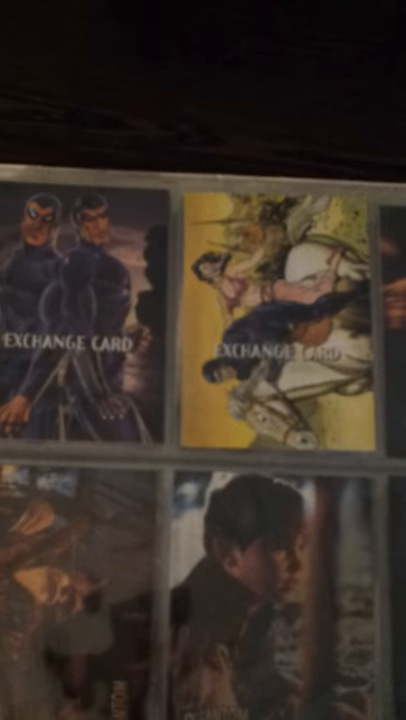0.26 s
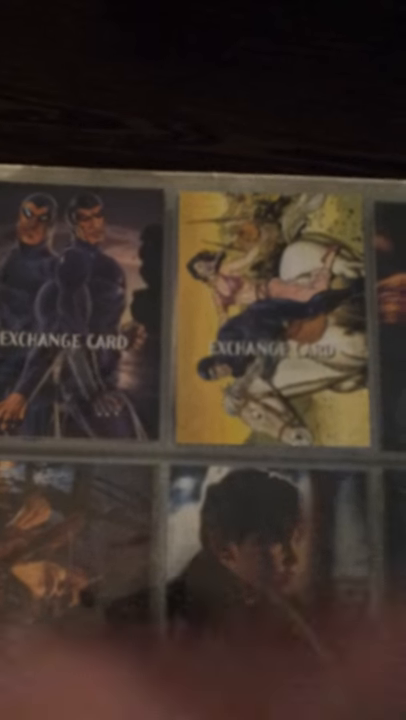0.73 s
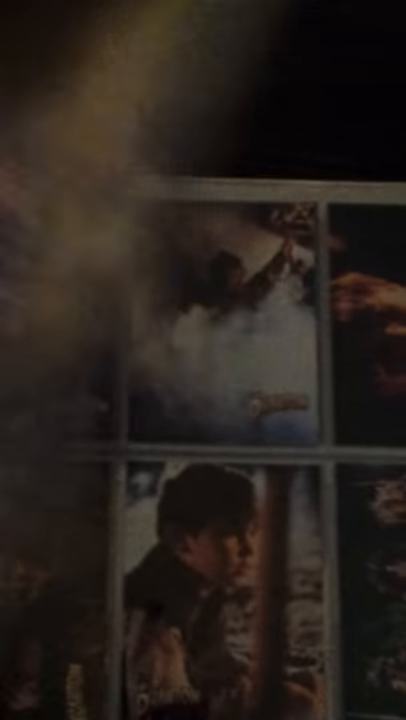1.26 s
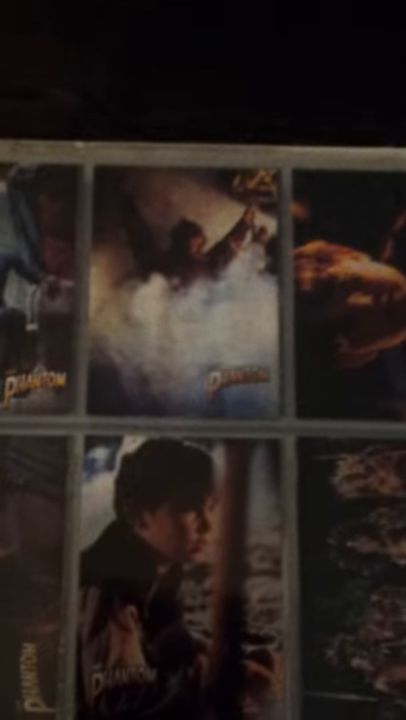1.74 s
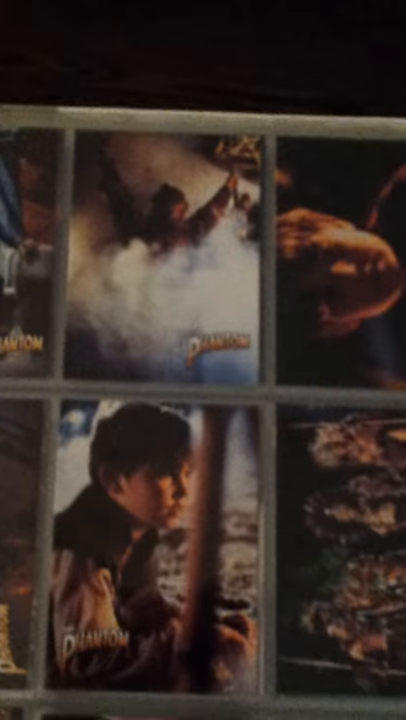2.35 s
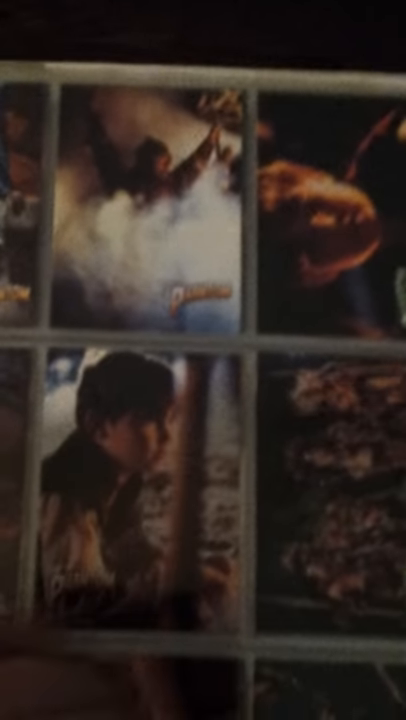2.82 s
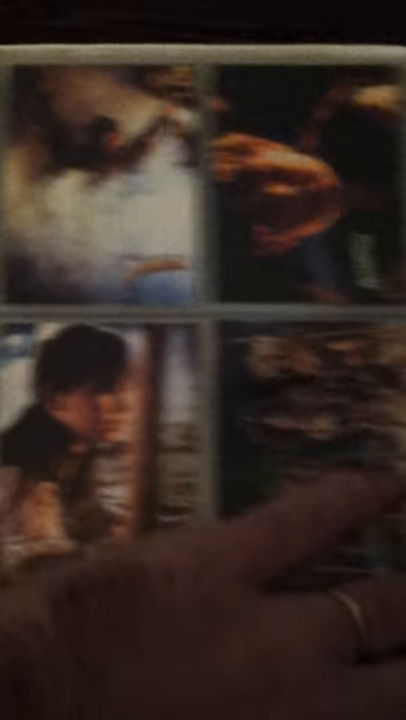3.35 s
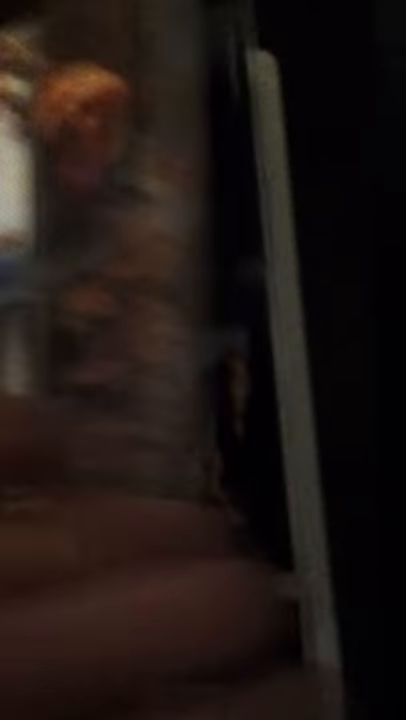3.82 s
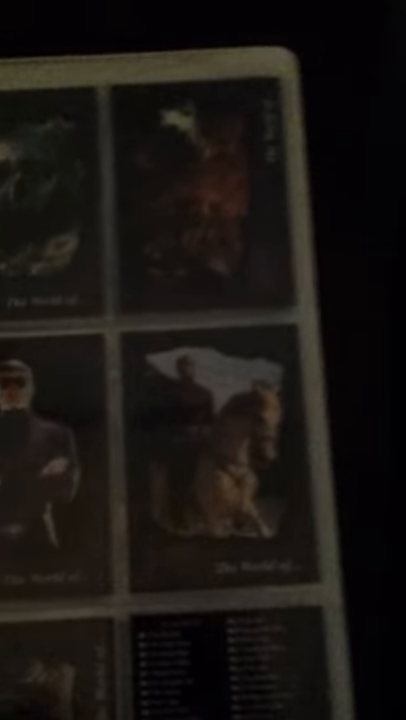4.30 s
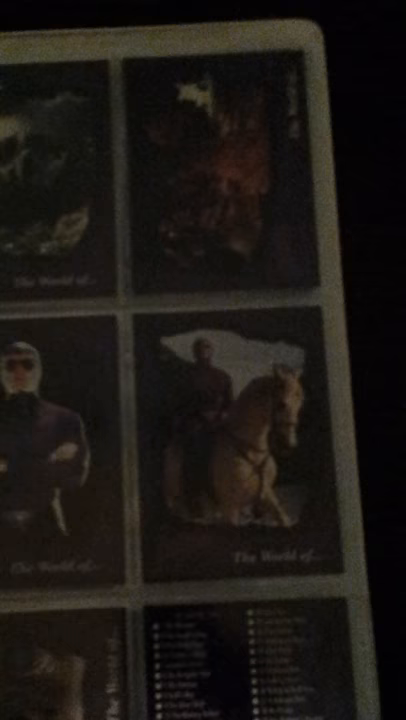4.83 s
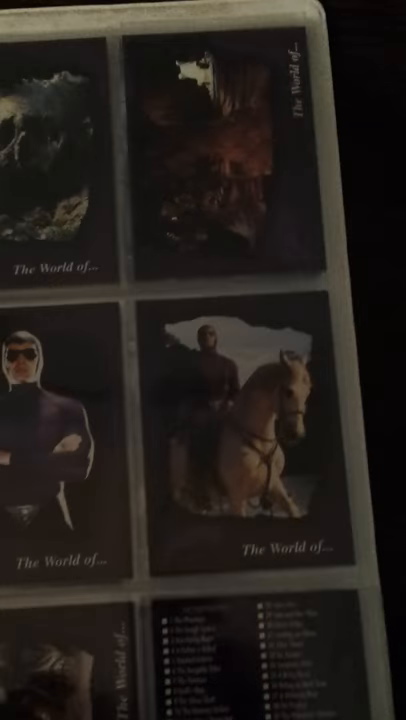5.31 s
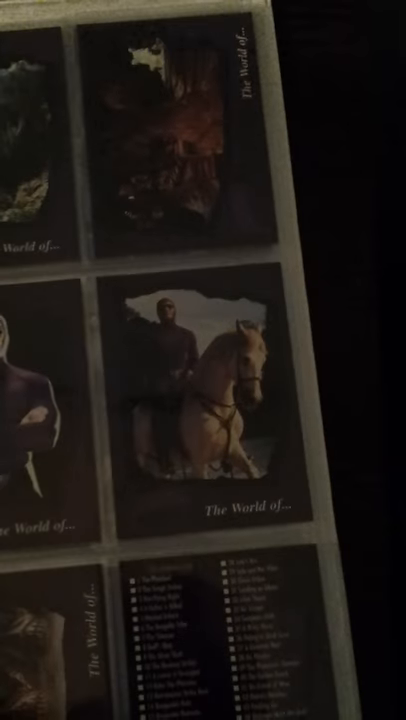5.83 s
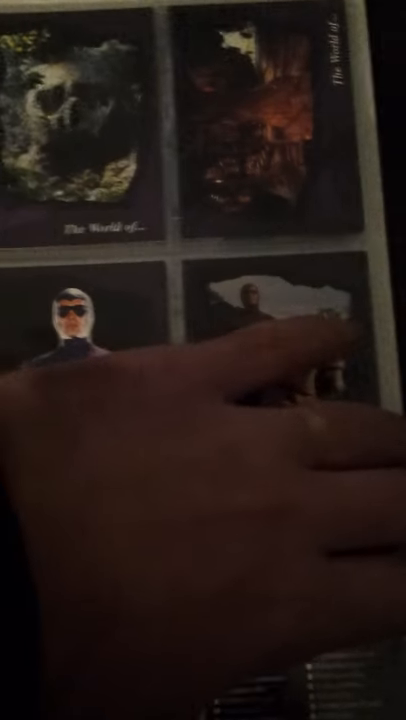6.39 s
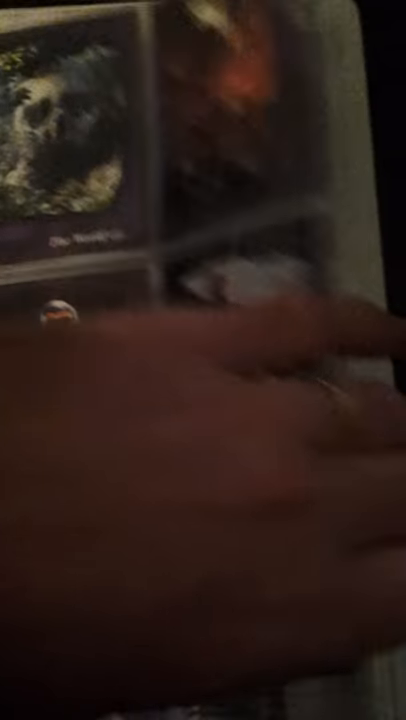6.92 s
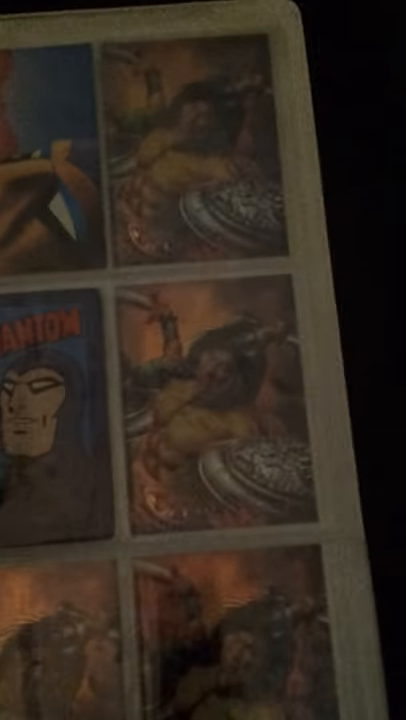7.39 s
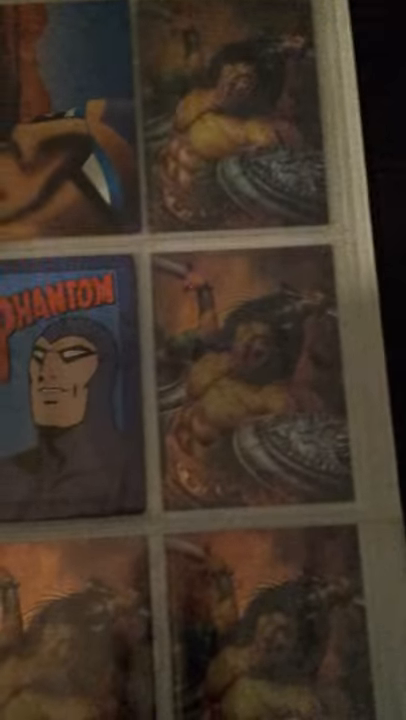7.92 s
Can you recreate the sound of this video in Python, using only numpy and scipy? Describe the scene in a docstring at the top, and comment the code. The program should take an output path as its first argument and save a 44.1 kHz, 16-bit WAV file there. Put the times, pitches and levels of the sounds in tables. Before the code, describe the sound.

A hand turns plastic card sleeves in a ring binder, close to the microphone in a quiet room. The pages hiss and swish over each other, creases tick, and stiff cards snap in their pockets before each page lands with soft thumps. After a brief lull comes a longer stretch of crinkling that peaks in a few sharp snaps, then lighter brushing and one more crackling turn.

```python
"""A quiet room, close to a ring binder whose pages of plastic card sleeves are being turned.
A hand brushes and lifts each page, and the film hisses, rustles and swishes over its neighbour.
Creases flip with sharp ticks, a fingertip judders, and stiff cards snap in their buckling pockets.
The pages land on the stack with soft thumps, over faint air and a short room tail."""
import sys
import numpy as np
from scipy import signal
from scipy.fft import rfft, irfft
from scipy.io import wavfile
from scipy.ndimage import uniform_filter1d, map_coordinates

SR = 44100
rng = np.random.default_rng(int(sys.argv[2]) if len(sys.argv) > 2 else 0)


def int16_out(signal):
    """Quantize to a 16-bit WAV file."""
    q = np.round(np.clip(np.atleast_2d(signal).T, -1, 1) * 32767)
    wavfile.write(sys.argv[1], SR, q.astype(np.int16))


N = 359415
TIME = np.arange(N) / SR

# tone of cracking film: f/Hz, relative level/dB
CRACK_TONE = [(600, -20), (1800, -9), (4400, -8), (7000, -7), (8200, -10.5), (10000, -15.5), (12000, -19)]
# a page slides over its neighbour, levels at the end of the move: start/s, end/s, swell/dB,
# hiss/dB, rustle/dB, catches against the hiss/dB, swish/dB, swish f/Hz
PAGE_SLIDES = [(0.35, 0.814, 1, -71, -61.5, 2, -72, 1710),
               (0.859, 0.935, 6.5, -48.5, -50.5, -12, -63, 2990),
               (1.045, 1.312, 0, -58, -54, -15, -69, 3060), (1.281, 1.415, 11.5, -46.5, -46, -2, -44, 6660),
               (1.438, 1.493, 2, -40.5, -42.5, -5, -39.5, 5830),
               (1.526, 1.737, 2.5, -43.5, -48, -3, -49, 1595),
               (2.207, 2.345, 13.5, -41, -41, -18, -71, 1220),
               (4.035, 4.215, 5.5, -57, -51.5, 8, -50, 6600),
               (4.163, 4.213, 2.5, -40, -40, -6, -34.5, 6260),
               (4.255, 4.504, 6.5, -42.5, -42.5, 5, -45.5, 720),
               (4.616, 4.875, 17, -40, -41.5, -1.5, -44.5, 1687),
               (5.027, 5.105, 4, -46, -46.5, -0.5, -52.5, 1506),
               (5.495, 5.605, 13, -61, -40.5, -26.5, -36, 7240),
               (5.614, 5.641, 13, -39.5, -46.5, -9, -33.5, 7690),
               (7.28, 7.338, 4.5, -37, -42.5, 6.5, -46.5, 910),
               (7.33, 7.544, 4.5, -40.5, -46, -4.5, -50, 1793),
               (7.768, 7.941, -5, -51.5, -50, 4, -66, 1510)]


def from_db(db):
    """Decibels to gain."""
    return 10 ** (np.asarray(db) / 20)


def rms_one(x):
    """Scale to rms 1."""
    return x / np.sqrt(np.mean(x ** 2) + 1e-20)


def at_hz(points, hz):
    """Read a curve on a log-frequency axis."""
    f, value = np.transpose(points)
    return np.interp(np.log(np.maximum(hz, 1)), np.log(f), value)


def colour(x, spectrum, size=2048):
    """Minimum-phase EQ of the given spectrum; white noise keeps its power."""
    cepstrum = irfft(np.log(from_db(at_hz(spectrum, np.fft.rfftfreq(size, 1 / SR)))))
    cepstrum[1:size // 2] *= 2
    cepstrum[size // 2 + 1:] = 0
    response = irfft(np.exp(rfft(cepstrum)))
    return signal.fftconvolve(x, response / np.linalg.norm(response))[:len(x)]


def resonate(x, hz, width_hz):
    """One resonance with gain 1 at its peak."""
    r = np.exp(-np.pi * width_hz / SR)
    feedback = [1, -2 * r * np.cos(2 * np.pi * hz / SR), r * r]
    return signal.lfilter(np.array([1, 0, -1]) * (1 - r * r) / 2, feedback, x + 1e-18)


def drift(per_s):
    """A random wander with a spread near 1."""
    return np.interp(TIME * per_s, np.arange(4096), rng.standard_normal(4096))


def add(out, s, sound):
    """Mix a sound in, starting at time s."""
    start = max(int(s * SR), 0)
    out[start:start + len(sound)] += sound[:max(N - start, 0)]


def at_level(sound, db):
    """Give a short sound the energy of 9 ms at this level."""
    return sound * from_db(db) * np.sqrt(.009 * SR / (np.sum(sound ** 2) + 1e-20))


def still_air():
    """Room tone: a faint, steady bed of dark noise."""
    # tone of the air: f/Hz, relative level/dB
    air_tone = [(20, -5), (48, 3.5), (400, -5), (2000, -13), (4500, -15), (7000, -13.5), (12000, -18.5)]
    return from_db(-57.5) * colour(rng.standard_normal(N), air_tone, size=8192)


def room(x, wet_db=-11, build_s=0.0035, size=22050):
    """A diffuse tail that builds up as the walls answer; the bass stays dry."""
    # decay of the room: f/Hz, t60/s
    decay_times = [(500, 0.34), (1400, 0.47)]
    # tone of the tail: f/Hz, band level/dB
    tail_tone = [(500, -1), (850, 2), (1600, -4.5)]
    t, tail = np.arange(size) / SR, np.zeros(size)
    edges_hz = np.geomspace(450, 14000, 7)
    for low, high in zip(edges_hz, edges_hz[1:]):
        bandpass = signal.butter(2, [low, high], "band", fs=SR, output="sos")
        band = signal.sosfilt(bandpass, rng.standard_normal(size))
        hz = np.sqrt(low * high)
        shape = (1 - np.exp(-(t / build_s) ** 2)) * from_db(-60 * t / at_hz(decay_times, hz))
        tail += from_db(at_hz(tail_tone, hz)) * band * shape / np.linalg.norm(shape)
    return from_db(wet_db) * signal.fftconvolve(x, tail)[:N]


def judders(slip_hz=146, unsteady=0.093, octave_db=-17, size=16384):
    """Skin sticks and slips at a nearly steady rate, making the page hum."""
    # a fingertip drags across a sleeve: t/s, length/s, relative level/dB
    drags = [(6.531, 0.16, -47.5), (6.745, 0.067, -55)]
    out, t = np.zeros(N), np.arange(size) / SR
    phase = 2 * np.pi * np.cumsum(slip_hz * (1 + unsteady * drift(83)[:size])) / SR
    hum = np.sin(phase) + from_db(octave_db) * np.sin(2 * phase)
    for s, length, db in drags:
        stroke = np.sin(np.pi * np.minimum(t / length, 1))
        add(out, s, from_db(db - 1) * stroke * hum)
    return out


def thumps(cycles=0.57, shudder_s=0.032, build_s=0.0065, slap_hz=370, slap_s=0.0069, size=8192):
    """A page slaps down and pushes out a cushion of air in one damped swing; the stack shudders."""
    # page or hand meets the stack: t/s, level/dB, f/Hz
    landings = [(0.909, -39.5, 250), (1.152, -50, 324), (1.502, -36.5, 131), (1.553, -32.5, 95),
                (1.757, -27, 88.5), (1.947, -27, 190), (2.129, -28.5, 150), (2.205, -35.5, 109),
                (2.34, -30, 140), (3.169, -46, 149), (3.312, -43.5, 155), (3.477, -44.5, 145),
                (4.865, -33.5, 109), (4.997, -36, 199), (5.187, -34, 140), (5.238, -27.5, 150),
                (5.315, -27, 140.5), (5.674, -25, 148), (7.509, -37.5, 100), (7.899, -31, 122),
                (7.944, -35.5, 115), (8.12, -37, 115)]
    out, t = np.zeros(N), np.arange(size) / SR
    for (s, db, hz), noise in zip(landings, rng.standard_normal((len(landings), 2, size))):
        swing = np.sin(2 * np.pi * hz * t) * np.exp(-t * hz / cycles)
        stack = rms_one(resonate(noise[0], hz, width_hz=0.53 * hz))
        shudder = from_db(-9) * stack * (1 - np.exp(-t / build_s)) * np.exp(-t / shudder_s)
        slap = from_db(-7) * rms_one(resonate(noise[1], slap_hz, slap_hz)) * np.exp(-t / slap_s)
        add(out, s - .002, from_db(db) * (swing + shudder + slap))
    return out


def page_gap(x, gap_s=0.000659, wander=0.43, echo=0.31):
    """The gap under the page adds a close echo whose delay wanders as the page moves."""
    delay = gap_s * np.exp(wander * drift(7))
    delayed = map_coordinates(x, [(TIME - delay) * SR], order=3)
    return (x + echo * delayed) / np.hypot(1, echo)


def slide_speed(length_s, swell_db, attack_s=0.0194, release_s=0.028, size=32768):
    """A slide takes hold, gains or loses speed steadily up to its end, and stops short."""
    t = np.arange(size) / SR
    swell = from_db(swell_db * (np.minimum(t / length_s, 1) - 1))
    return np.minimum(t / attack_s, 1) * swell * np.exp(-np.maximum(t - length_s, 0) / release_s)


def swishes(half_width=0.24, flutter_db=3, glide=0.062, size=32768):
    """The grain of the film rubs in a narrow band that follows the speed of the stroke."""
    out = np.zeros(N)
    for start, end, swell, *_, db, hz in PAGE_SLIDES:
        speed = slide_speed(end - start, swell, size=size)
        phase = 2 * np.pi * np.cumsum(hz * (1 + glide * (speed - .5))) / SR
        lowpass = signal.butter(3, half_width * hz, fs=SR, output="sos")
        grain = signal.sosfilt(lowpass, rng.standard_normal((2, size)))
        band = rms_one(grain[0] * np.cos(phase) + grain[1] * np.sin(phase))
        add(out, start, from_db(db) * speed * band)
    return page_gap(out) * from_db(flutter_db * drift(200))


def strokes(brush_rustle_db=-4.5, brush_catch_db=-2):
    """Slides and brushes sum in power to a hiss envelope, a rustle envelope and a share of catches."""
    # fingers brush a sleeve, swelling and fading evenly: middle/s, length at half height/s, hiss/dB
    brushes = [(0.816, 0.096, -52.5), (1.032, 0.061, -51), (1.844, 0.09, -52.5), (1.99, 0.1, -51),
               (3.17, 0.047, -56), (3.286, 0.039, -58), (3.734, 0.025, -42), (3.909, 0.0082, -40),
               (6.327, 0.092, -58), (6.591, 0.042, -44.5), (6.994, 0.14, -56), (7.076, 0.012, -47.5),
               (7.172, 0.12, -53)]
    moves = [(start, slide_speed(end - start, swell), hiss, rustle, catch)
             for start, end, swell, hiss, rustle, catch, _, _ in PAGE_SLIDES]
    moves += [(s - length, np.hanning(int(2 * length * SR)), db, db + brush_rustle_db, brush_catch_db)
              for s, length, db in brushes]
    film, sheet, catching = np.zeros((3, N))
    for start, speed, hiss, rustle, catch in moves:
        add(film, start, (from_db(hiss) * speed) ** 2)
        add(sheet, start, (from_db(rustle) * speed) ** 2)
        add(catching, start, (from_db(hiss + catch) * speed) ** 2)
    return np.sqrt(film), np.sqrt(sheet), np.sqrt(catching / (film + 1e-20))


def crackle(per_s=1200, clump_db=5, size_spread_db=2.5):
    """Tiny catches of uneven size, arriving in clumps; rms 1."""
    hits = rng.random(N) < per_s * from_db(clump_db * drift(60)) / SR
    sizes = from_db(size_spread_db * np.minimum(rng.exponential(1, N), 3))
    return rms_one(hits * sizes * rng.choice([-1, 1], N))


def sliding(trim_db=-1, flutter_db=3, sheet_catch_db=-4):
    """Smooth friction mixed with catches; the film hisses and the sheet rustles under the same stroke."""
    # bright hiss of the film: f/Hz, relative level/dB
    hiss_tone = [(1500, -20), (3200, -10), (4400, -11.5), (6700, -4.5), (8000, -12), (9500, -16.5),
                 (12000, -28)]
    # midrange rustle of the sheet: f/Hz, relative level/dB
    rustle_tone = [(120, -8.5), (350, -12.5), (780, -1.5), (1050, -9), (1400, -3.5), (1750, -5),
                   (2200, -5.5), (2800, -4.5), (6000, -22.5)]
    hiss, rustle, catch_share = strokes()
    catches = catch_share * crackle()
    pressure = from_db(trim_db + flutter_db * drift(90))
    film = colour(rng.standard_normal(N) + catches, hiss_tone)
    sheet = colour(rng.standard_normal(N) + from_db(sheet_catch_db) * catches, rustle_tone)
    friction = pressure * (hiss * film + rustle * sheet)
    return page_gap(friction) / np.sqrt(1 + catch_share ** 2 / 2)


def pocket_ring(x, chance, width_hz):
    """Every pocket rings briefly at a pitch of its own."""
    return resonate(x, 6400 * 2 ** (0.16 * np.clip(chance, -2, 2)), width_hz)


def ticks(flip_s=0.000093, shiver_s=0.00076, follow_s=0.0031, size=1024):
    """A crease flips in a fraction of a millisecond and sets off its neighbours; the film shivers."""
    # flips of creases in the bare film: t/s, level/dB
    creases = [(1.087, -43.5), (1.9492, -29.5), (1.9719, -34), (2.2005, -43), (2.2076, -28), (2.242, -29.5),
               (3.789, -43.5), (4.034, -45), (4.055, -40), (4.128, -40.5), (4.1592, -37.5), (4.2, -46),
               (4.2053, -37), (4.215, -34), (4.222, -40), (4.285, -37), (4.329, -31), (4.334, -27),
               (4.35, -33), (4.377, -26), (4.38, -29.5), (4.3962, -39), (4.421, -41), (4.439, -36),
               (4.4468, -40), (4.452, -33.5), (4.46, -28.5), (4.4645, -30.5), (4.478, -36), (4.4892, -28.5),
               (4.531, -30.5), (4.5796, -42.5), (5.1064, -41), (5.1826, -27.5), (5.2358, -23.5),
               (5.452, -39.5), (6.6377, -44.5), (6.819, -40.5), (7.003, -44), (7.0922, -35.5),
               (7.213, -40.5), (7.3263, -34), (7.6821, -35), (7.887, -32)]
    out, t = np.zeros(N), np.arange(size) / SR
    noises = rng.standard_normal((len(creases), size))
    for (s, db), noise in zip(creases, noises):
        shape = np.exp(-t / flip_s) + from_db(-13) * np.exp(-t / shiver_s)
        for lag in follow_s * rng.random(2):
            shape += from_db(-8) * np.exp(-np.abs(t - lag) / flip_s)
        # bare film is brighter than film backed by a card
        flip = signal.lfilter([1, -0.51], [1], noise * shape)
        flip += from_db(5) * pocket_ring(flip, chance=noise[-1], width_hz=1100)
        add(out, s, at_level(colour(flip, CRACK_TONE), db))
    return out


def page_knock(push, card_hz, db_per_octave=-7):
    """A card drives the page modes less the further they lie from its pitch, and hardly at all far below."""
    # modes of a page stiffened by its cards: f/Hz, width/Hz, relative level/dB
    page_modes = [(544, 61, -13.5), (843, 260, 10.5), (1144, 110, 7), (1430, 360, 11.5), (2040, 1030, 4.5),
                  (4450, 340, 9)]
    page = np.zeros(len(push))
    for k, (hz, width, db) in enumerate(page_modes):
        gain = from_db(db + db_per_octave * abs(np.log2(hz / card_hz)))
        page += (-1) ** k * gain * resonate(push, hz, width)
    low_cut = signal.butter(4, min(0.49 * card_hz, 700), "high", fs=SR, output="sos")
    return rms_one(signal.sosfilt(low_cut, page))


def card_tock(t, hz, noise, rise_s, cycles=0.85, wobble_rad=0.98):
    """The card itself tocks: a few wobbling cycles at its own pitch."""
    wobble = wobble_rad * rms_one(uniform_filter1d(uniform_filter1d(noise, size=48), size=48))
    envelope = 1 / (np.exp(-t / rise_s) + np.exp(t * hz / cycles))
    return rms_one(envelope * np.sin(2 * np.pi * hz * t + wobble))


def snaps(spread_s=0.0031, card_drag=0.29, settle_s=0.026, lumpy_db=4, lead_s=0.012, size=3072):
    """Each buckle is a rush of tiny slips: the film cracks and the card in the pocket knocks."""
    # a card snaps in its pocket: t/s, crack/dB, knock/dB, card f/Hz
    buckles = [(1.1539, -70, -41, 570), (1.536, -61, -42, 417), (1.7618, -39, -40, 1650),
               (1.9491, -23.5, -35, 1030), (1.9725, -34.5, -39.5, 2380), (2.036, -48, -41.5, 1760),
               (2.1321, -43, -44, 1210), (2.209, -49, -34.5, 1610), (2.2439, -33, -34, 860),
               (2.3251, -49, -34, 1240), (2.3629, -65, -35.5, 1200), (3.47, -52.5, -51.5, 1270),
               (3.9111, -42.5, -37, 2830), (4.2102, -35, -34, 2250), (4.2851, -34, -45, 910),
               (4.4809, -27.5, -35.5, 790), (4.4925, -29.5, -40, 1640), (4.5221, -30, -41, 875),
               (4.862, -37.5, -35.5, 1420), (4.9941, -38, -33.5, 686), (5.0998, -33.5, -38, 1370),
               (5.1859, -26.5, -24, 1450), (5.238, -18, -21.5, 1590), (5.275, -29.5, -24, 1480),
               (5.3129, -16, -15, 1310), (5.543, -44, -37.5, 1260), (5.6489, -29.5, -39, 1500),
               (5.674, -50, -36, 1230), (6.3192, -47.5, -51.5, 1270), (7.0645, -34, -34.5, 4400),
               (7.585, -63, -35.5, 1680), (7.6875, -29.5, -27.5, 1770), (7.7709, -33, -35, 1590),
               (7.849, -49, -37.5, 1040), (7.8985, -34, -32, 1010), (7.943, -42, -38.5, 1320),
               (8.119, -39.5, -33.5, 2000)]
    out, t = np.zeros(N), np.arange(size) / SR - lead_s
    after = np.maximum(t, 0)
    settling = from_db(-24) * np.exp(-after / settle_s)
    hardest_db = max(row[1] for row in buckles)
    for s, crack_db, knock_db, hz in buckles:
        slip_noise, push_noise, card_noise, lump_noise = rng.standard_normal((4, size))
        # loose film gives way at once, a heavy card takes longer
        rise_s = spread_s * from_db(card_drag * np.clip(knock_db - crack_db, -20, 2))
        fall_s = 0.87 * rise_s
        # the first slip is abrupt, then the rush swells to its peak
        swell = (t > -0.76 * rise_s) * np.exp(np.minimum(t, 0) / rise_s)
        lumps = from_db(lumpy_db * rms_one(uniform_filter1d(lump_noise, size=20)))
        slips = slip_noise * lumps * swell * (np.exp(-after / fall_s) + settling)
        slips += from_db(3) * pocket_ring(slips, chance=card_noise[0], width_hz=1440)
        # the harder the crack, the keener its edge
        slips += from_db(crack_db - hardest_db - 3) * resonate(slips, hz=11000, width_hz=2500)
        crack = at_level(colour(slips, CRACK_TONE), crack_db)
        push = push_noise * swell ** 2 * (np.exp(-after / (1.1 * fall_s)) + settling)
        knock = page_knock(push, hz) + from_db(-1) * card_tock(t, hz, card_noise, 0.3 * rise_s)
        add(out, s - lead_s, crack + at_level(knock, knock_db))
    return out


def scene():
    """The binder, the still air and the room's answer, in mono."""
    binder = snaps() + ticks() + sliding() + swishes() + thumps() + judders()
    return (binder + still_air() + room(binder))[None]


def record(dry, cutoff_hz=11900):
    """A steep low-pass takes off the very top."""
    return signal.sosfilt(signal.ellip(10, .2, 60, cutoff_hz, fs=SR, output="sos"), dry)


dry = scene()
out = record(dry)
int16_out(out)
```